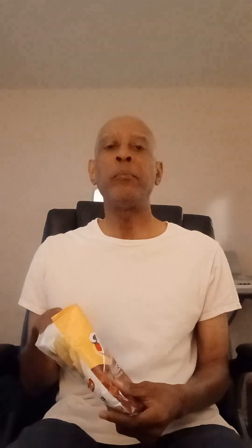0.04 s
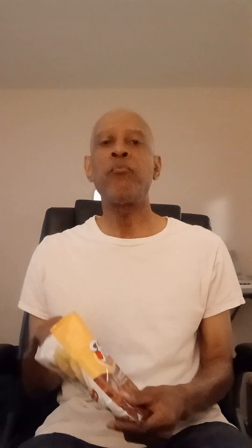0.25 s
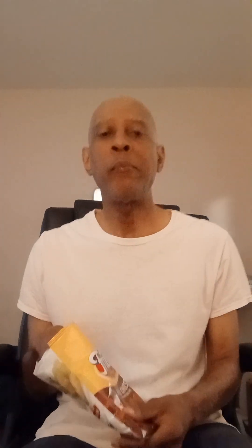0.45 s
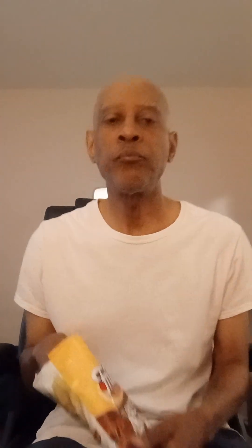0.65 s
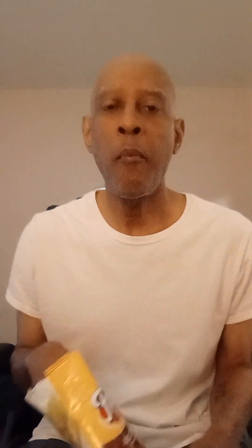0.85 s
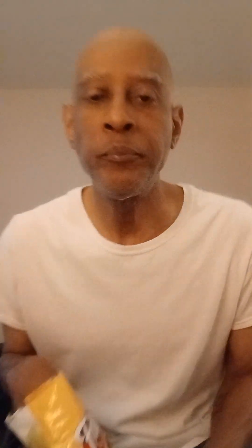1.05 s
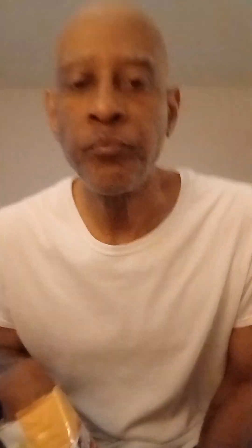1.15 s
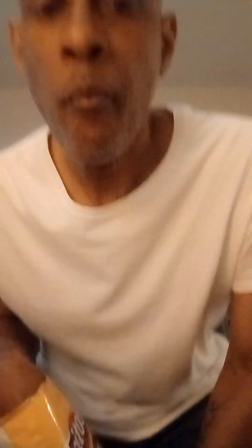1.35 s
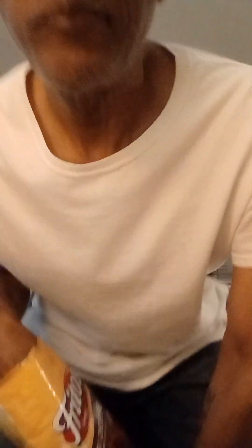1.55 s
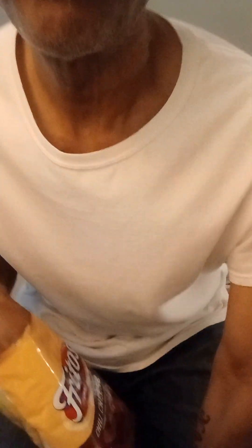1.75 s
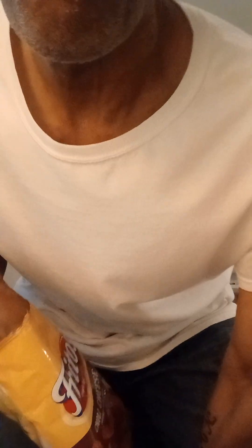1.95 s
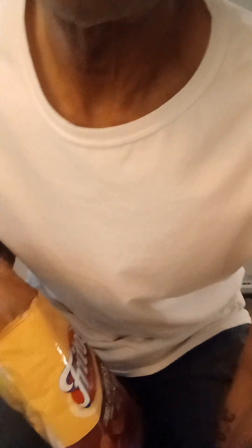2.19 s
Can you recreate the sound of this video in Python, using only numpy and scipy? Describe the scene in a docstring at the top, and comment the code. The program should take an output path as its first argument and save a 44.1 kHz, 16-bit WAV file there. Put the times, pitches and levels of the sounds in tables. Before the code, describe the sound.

A foil snack bag crackles at once, a crisp snap near 0.1 s, then lighter crinkles to 0.35 s and near quiet. Sharp clusters burst around 0.75-0.9 and 1.1-1.2 s. At about 1.3-1.4 s a chair and table thump low and dull. Strong snaps return at 1.6-1.8 s, then faint crinkle, soft cloth rustle and a slight bump at 1.9 s. Small room, close microphone, very faint hum.

```python
"""Still air and a hum lie under the whole scene; a small room answers the bag.
A foil snack bag is handled from the start: creases snap over, each a short crack of its own colour,
above a fine crinkle of ticks and hiss; more cracks cluster near 0.75 and 1.15 s.
About 1.3 s, as a man leans out of his chair, chair and table thump low: shaped noise and ringing modes.
Strong cracks return until 1.8 s, then only faint ones, with dull rustle and one last bump."""
import sys
import numpy as np
from scipy import signal
from scipy.fft import rfft, irfft, next_fast_len
from scipy.io import wavfile
from scipy.ndimage import map_coordinates

SR = 44100
rng = np.random.default_rng(int(sys.argv[2]) if len(sys.argv) > 2 else 0)


def gain_from_decibels(decibels):
    """Convert decibel values to linear amplitude factors."""
    exponent = np.asarray(decibels, float) / 20
    return 10 ** exponent


def unload_wav(signal):
    """Save mono or channel-first audio to the path in sys.argv[1] as 16-bit WAV at rate SR, clipped to [-1, 1]."""
    wavfile.write(
        sys.argv[1],
        SR,
        np.round(np.clip(np.atleast_2d(signal).T, -1, 1) * 32767).astype(np.int16),
    )


N = 98078  # samples


def unit(x):
    """Scales to rms 1."""
    return x / np.sqrt(np.mean(x ** 2) + 1e-20)


def along(points, hz):
    """Reads (Hz, value) points on a log frequency axis."""
    point_hz, value = np.transpose(points)
    return np.interp(np.log(hz + 1), np.log(point_hz + 1), value)


def curves(rows):
    """One value per sample for each column after the time."""
    time_s, *columns = np.transpose(rows)
    return [np.interp(np.arange(N) / SR, time_s, column) for column in columns]


def wobble(rate_hz):
    """A smooth random curve, rate_hz knots a second."""
    knots = rng.standard_normal(int(N * rate_hz / SR) + 4)
    return map_coordinates(knots, [np.arange(N) * rate_hz / SR])


def filtered(x, response):
    """x times a complex response of frequency."""
    size = next_fast_len(N + SR // 2)
    return irfft(rfft(x, size) * response(np.fft.rfftfreq(size, 1 / SR)), size)[..., :N]


def noise(spectrum, alike):
    """Stereo noise of rms 1; alike is the correlation of the sides."""
    a, b = filtered(rng.standard_normal((2, N)), lambda hz: gain_from_decibels(along(spectrum, hz)))
    turn = np.arccos(np.clip(alike, -1, 1)) / 2
    left = np.cos(turn) * a + np.sin(turn) * b
    right = np.cos(turn) * a - np.sin(turn) * b
    return unit(np.array([left, right]))


# still-air spectrum: freq_hz, relative_db
AIR_SPECTRUM = [(120, -49), (200, -21), (361, -12), (814, -58), (2510, -8), (10200, -17), (12500, -18),
                (15600, -6), (16500, -38)]
AIR_RMS_DB = -76.5
HUM_HZ, HUM_PEAK_DB = 123.8, -67.5


def floor():
    """Still room air as shaped noise, and a hum as a sine of wavering level."""
    hum_gain = gain_from_decibels(HUM_PEAK_DB + 0.92 * wobble(5.72))
    hum = hum_gain * np.sin(2 * np.pi * HUM_HZ * np.arange(N) / SR)
    return gain_from_decibels(AIR_RMS_DB) * noise(AIR_SPECTRUM, 0.057) + hum


# reverberation: freq_hz, t60_s
ROOM_DECAY = [(200, 0.24), (1500, 0.28), (5000, 0.31), (14000, 0.24)]
ROOM_DB, ROOM_GAP_S = -6, .003


def room(x):
    """Each frequency dies at its own speed; every 0.1 s stretch meets a new noise tail."""
    out, step = np.zeros((2, N + 2 * SR)), SR // 10
    for start in range(0, N, step):
        hz, t, z = signal.stft(rng.standard_normal((2, SR // 2)), SR, nperseg=256)
        decay = gain_from_decibels(-60 * t / along(ROOM_DECAY, hz)[:, None])
        tail = signal.istft(z * decay, SR, nperseg=256)[1]
        tail = tail / np.linalg.norm(tail[0])
        wet = signal.fftconvolve(x[:, start:start + step], tail, axes=1)
        out[:, start + round(ROOM_GAP_S * SR):][:, :wet.shape[1]] += wet
    return out[:, :N]


# chair rumble: time_s, deep_db, upper_bass_db
CHAIR_LEVELS = [(0.0, -70, -95), (0.2, -61.5, -73), (0.22, -46, -62), (0.3, -53.5, -73), (0.67, -68, -69.5),
                (0.72, -50.5, -63), (0.77, -64.5, -64), (1.03, -61.5, -71), (1.21, -86, -54.5),
                (1.3, -60, -54), (1.32, -42, -29.5), (1.34, -51, -26), (1.375, -28, -37), (1.415, -31, -41),
                (1.45, -58, -51.5), (1.67, -61, -61), (1.74, -51, -56.5), (1.87, -67, -66),
                (1.94, -64, -52.5), (1.98, -78, -66), (2.03, -57, -58), (2.13, -68, -67),
                (2.16, -69, -52.5), (2.22, -82, -65)]
# rumble spectra: freq_hz, relative_db
DEEP_SPECTRUM = [(18, -58), (30, 1), (54, -3.5), (86, -10), (100, -14), (130, -63), (220, -120)]
UPPER_SPECTRUM = [(47, 1), (80, 0), (130, 4.5), (237, 1), (280, -12), (360, -24), (620, -120)]
# rustle of clothes and upholstery: time_s, relative_db
CLOTH_LEVELS = [(0.0, -82), (0.04, -84), (0.07, -55.5), (0.18, -78.5), (0.22, -60.5), (0.44, -82.5),
                (0.61, -61), (0.695, -71.5), (0.72, -54.5), (0.83, -52), (0.98, -77.5), (0.99, -61.5),
                (1.1, -72.5), (1.12, -52), (1.29, -55), (1.32, -55), (1.38, -49.5), (1.48, -64), (1.5, -54),
                (1.56, -73), (1.58, -46.5), (1.8, -55), (1.85, -66.5), (1.95, -55), (1.98, -66),
                (2.02, -53.5), (2.1, -78.5), (2.17, -61.5), (2.22, -78)]
# rustle spectrum: freq_hz, relative_db
CLOTH_SPECTRUM = [(150, -43), (250, -1.5), (318, 1.5), (461, 5.5), (700, -6.5), (910, -30), (1540, -120)]
CLOTH_GAIN_DB = 0.5


def chair():
    """Shifting weight: two bands of lumpy low rumble and a dull rustle."""
    deep_db, upper_db = curves(CHAIR_LEVELS)
    cloth_db, = curves(CLOTH_LEVELS)
    deep = gain_from_decibels(deep_db + 0.55 * wobble(21.0)) * noise(DEEP_SPECTRUM, 0.93)
    upper = gain_from_decibels(upper_db + 0.45 * wobble(30.2)) * noise(UPPER_SPECTRUM, 0.69)
    cloth_gain = gain_from_decibels(cloth_db + CLOTH_GAIN_DB + 2.24 * wobble(49.72))
    return deep + upper + cloth_gain * noise(CLOTH_SPECTRUM, 0.77)


# soft blows: start_s, relative_db, hardness_db_per_octave (tilt about the third table mode)
BUMP_EVENTS = [(0.209, -41.5, -3), (0.711, -40.5, 9), (1.308, -34.5, 10), (1.321, -19.5, -7.5),
               (1.339, -20, -11.5), (1.369, -32.5, 4), (1.393, -40, 3), (1.408, -46, 4),
               (1.496, -40.5, 7.5), (1.915, -41.5, -11.5)]
# table modes: freq_hz, relative_db, t60_s
TABLE_MODES = [(43.5, -17, 0.2), (74, -11, 0.067), (132.2, 3.5, 0.099), (221.7, 2, 0.086),
               (313.4, -5.5, 0.069), (345.6, -9.5, 0.12)]
BUMP_GAIN_DB, BUMP_RISE_S = -4.5, 0.0076


def bumps():
    """Soft blows ring the table's low modes, harder ones brighter, each mode's level varying at random."""
    out, t = np.zeros(N + SR), np.arange(SR // 2) / SR
    pivot_hz = TABLE_MODES[2][0]
    for start_s, level_db, hard_db in BUMP_EVENTS:
        ring = 0
        for hz, mode_db, t60_s in TABLE_MODES:
            mode_db = mode_db + hard_db * np.log2(hz / pivot_hz) + rng.normal(0, 1)
            ring = ring + gain_from_decibels(mode_db - 60 * t / t60_s) * np.sin(2 * np.pi * hz * t)
        rise = 1 - np.exp(-t / BUMP_RISE_S)
        out[round(start_s * SR):][:len(t)] += gain_from_decibels(level_db + BUMP_GAIN_DB) * ring * rise
    return out[:N]


# small flat foil facets that pop: start_s, relative_db, pitch_hz
PING_EVENTS = [(0.283, -42, 3270), (0.982, -43, 2930), (1.164, -47, 2440), (1.306, -32.5, 730),
               (1.336, -40.5, 2690), (1.336, -42, 6980), (1.643, -31, 2940), (1.886, -49, 2130),
               (2.101, -58, 7300), (2.160, -46.5, 7140)]
PING_T60_S, PING_RISE_S = .02, 0.0013


def pings():
    """Each facet rings as a close pair of notes and dies fast."""
    out, t = np.zeros(N + SR), np.arange(4096) / SR
    for start_s, level_db, hz in PING_EVENTS:
        second_hz = hz * rng.normal(1, 0.01)
        pair = np.sin(2 * np.pi * hz * t) + .5 * np.sin(2 * np.pi * second_hz * t)
        envelope = gain_from_decibels(level_db - 60 * t / PING_T60_S) * (1 - np.exp(-t / PING_RISE_S))
        out[round(start_s * SR):][:len(t)] += envelope * pair
    return out[:N]


GRAINS, SPREAD_DB, LIFE_CYCLES = 5000, 4.5, 4


def ticks(lo_hz, hi_hz, spectrum):
    """Random tiny ticks, each a damped sine of a few cycles and uneven size; rms 1."""
    u, t = rng.random((GRAINS, 3)), np.arange(192) / SR
    hz = lo_hz * (hi_hz / lo_hz) ** u[:, 1:2]
    size_db = -SPREAD_DB * np.log(1.01 - u[:, 2:]) + along(spectrum, hz)
    wave = gain_from_decibels(size_db) * hz * np.sin(2 * np.pi * hz * t) * np.exp(-t * hz / LIFE_CYCLES)
    at = (u[:, :1] * N).astype(int) + np.arange(len(t))
    return unit(np.bincount(at.ravel(), wave.ravel(), N + len(t))[:N])


# squeezing hand: time_s, crinkle_db, body_db
CRINKLE_LEVELS = [(0, -36.5, -63), (.02, -54, -59.5), (.065, -55, -68), (.1, -48.5, -54.5), (.15, -68, -83),
                  (.22, -63, -60.5), (.3, -61, -70), (.36, -63, -77), (.45, -75, -80.5), (.6, -65, -65),
                  (.7, -68.5, -72), (.73, -61, -63), (.79, -43, -48), (.86, -63.5, -70), (.89, -49, -59),
                  (.95, -81, -83), (1.0, -59.5, -62.5), (1.1, -70, -83), (1.125, -39.5, -46),
                  (1.17, -47, -57.5), (1.23, -63, -58), (1.31, -53, -59.5), (1.42, -59, -70),
                  (1.56, -55, -62.5), (1.6, -46.5, -52), (1.7, -53.5, -57), (1.8, -58.5, -64),
                  (1.865, -66, -76), (1.9, -55, -64), (1.965, -59, -59.5), (2.05, -74.5, -89),
                  (2.13, -68.5, -76), (2.16, -59, -71.5), (2.22, -71, -80)]
# foil spectrum: freq_hz, relative_db
FOIL_SPECTRUM = [(880, -27), (1500, 1), (2110, -3), (2530, 6), (5470, 1.5), (9790, -5.5), (13500, 0),
                 (16000, -17), (16500, -45)]
# bag and chips spectrum: freq_hz, relative_db
BODY_SPECTRUM = [(350, -41), (600, -12), (818, -3), (989, -4), (2200, -2.5), (2860, -5), (4840, -120)]
TICK_DB, HISS_DB = -4, 0


def crinkle():
    """Fine ticks and the hiss of sliding foil follow the squeezing hand, in a high and a body band."""
    def texture(lo_hz, hi_hz, spectrum):
        return gain_from_decibels(TICK_DB) * ticks(lo_hz, hi_hz, spectrum) + gain_from_decibels(HISS_DB) * noise(spectrum, 0.33)

    foil_db, body_db = curves(CRINKLE_LEVELS)
    high = gain_from_decibels(foil_db + 1.18 * wobble(39.45)) * texture(2070, 13100, FOIL_SPECTRUM)
    low = gain_from_decibels(body_db + 2.62 * wobble(30.26)) * texture(610, 1678, BODY_SPECTRUM)
    return high + low


# creases: start_s, level_db, crease_hz, body_rel_db, crease_rel_db, treble_rel_db, drag_factor
# (drag_factor stretches rise and decay, before the extra drag of weak creases)
SNAP_EVENTS = [(0.075, -22.5, 3870, -23, -19, -13.5, 0.87), (0.083, -33, 5100, -37, -12, -5.5, 1.24),
               (0.1067, -35.5, 3400, -41, -11, -23, 1.3), (0.2343, -42.5, 3360, -16, -14, -14, 0.67),
               (0.2721, -32.5, 3740, -18.5, -18, -17, 1.33), (0.3172, -37.5, 3770, -10.5, -21, -37, 0.86),
               (0.3241, -29.5, 3460, -18, -11.5, -22.5, 0.86), (0.515, -51, 4170, -15, -8.5, -13, 1.2),
               (0.5917, -49, 2950, -11, -8, -33, 1.2), (0.6845, -45.5, 3300, -11, -12.5, -24, 0.86),
               (0.7088, -47, 2000, -4.5, -16, -35, 1.6), (0.7285, -39, 4840, -15, -8.5, -18, 1.1),
               (0.742, -49.5, 2350, -28, -2.5, 1, 0.48), (0.7587, -18.5, 4570, -21, -20, -12.5, 1.13),
               (0.767, -28.5, 5500, -13.5, -24, -18, 1.5), (0.7848, -29, 4830, -13, -24, -27, 1.12),
               (0.7962, -37.5, 3000, -3, -9.5, -29, 0.44), (0.8076, -22.5, 4700, -19, -25.5, -16.5, 1.2),
               (0.8788, -35, 4350, -9, -11, -10, 1.07), (1.018, -39.5, 5100, -19, -12, -34, 0.58),
               (1.1097, -42, 5200, -18, -13, -15, 0.87), (1.1209, -27.5, 4500, -14, -12.5, -23, 0.77),
               (1.1313, -35, 5020, -29, -28, -7.5, 1.05), (1.1492, -19, 3100, -15, -17, -10.5, 1.17),
               (1.1616, -27.5, 5660, -6.5, -15, -19, 1.53), (1.1645, -37.5, 2620, -33, -9, -3, 4.3),
               (1.2464, -44.5, 2500, -9, -9.5, -29, 0.77), (1.293, -35.5, 2110, -14.5, -11.5, -34, 0.58),
               (1.3085, -36, 2020, -17, -9, -14.5, 1.7), (1.3783, -26, 3370, -14.5, -14, -11.5, 1),
               (1.58, -28, 4830, -15, -13, -8.5, 1.4), (1.6439, -23.5, 3720, -27, -10.5, -16, 0.8),
               (1.6742, -16, 3750, -24, -17.5, -13.5, 1.23), (1.7237, -30.5, 5410, -17, -23, -13.5, 2),
               (1.7892, -33.5, 4800, -14.5, -14.5, -24, 0.66), (2.0033, -49.5, 3960, -7.5, -32, -39, 0.39),
               (2.1436, -51, 2550, -24, -11.5, -10, 2.7), ]
# body, crease, treble: t60_s at drag 1
SNAP_T60_S = [0.024, 0.02, 0.011]
# body, crease, treble: gain_db
SNAP_GAIN_DB = [2.5, 4, 2]
BODY_HZ, TREBLE_HZ = 1115, 10900
SNAP_OCTAVES = (0.56, 0.46, 1)  # band widths: body, crease, treble
RISE_S, CLICK = .001, 3.2  # at drag 1
SIDE_SHARE = 0.82  # rattle that differs left and right
LOUD_DB, DRAG_DB_PER_DB = -22.5, .2  # weaker creases drag longer


def snaps():
    """A crease loads up, then clicks over its rattle: in the bag's body, at its own pitch, in the treble."""
    out, t, lead = np.zeros((2, N + SR)), np.arange(4096) / SR, 256
    f = np.fft.rfftfreq(len(t), 1 / SR) + 1
    for start_s, level_db, crease_hz, *rel, drag in SNAP_EVENTS:
        drag = np.clip(drag * gain_from_decibels(DRAG_DB_PER_DB * (LOUD_DB - level_db)), .3, 6)
        late = t - lead / SR - RISE_S * drag
        peak = np.argmax(late >= 0)
        load = np.clip(1 + late / (RISE_S * drag), 0, 1) ** 2
        centres_hz = (BODY_HZ, crease_hz, TREBLE_HZ)
        crack = 0
        for hz, octaves, t60_s, gain_db, rel_db in zip(
                centres_hz, SNAP_OCTAVES, SNAP_T60_S, SNAP_GAIN_DB, rel):
            middle, side = rng.standard_normal((2, len(t)))
            decay = gain_from_decibels(-60 * np.abs(late) / (t60_s * drag))
            rattle = middle + SIDE_SHARE * np.outer([1, -1], side)
            burst = rattle * np.where(late < 0, load, decay)
            burst[:, peak] += CLICK / drag ** 2
            bell = np.exp(-.5 * (np.log2(f / hz) / octaves) ** 2)
            band = irfft(rfft(burst) * bell)
            band = band / band[:, peak:peak + 128].std()
            crack = crack + gain_from_decibels(level_db + rel_db + gain_db) * band
        start = round(start_s * SR)
        out[:, start:start + len(t)] += crack
    return out[:, lead:N + lead]


LEFT_LAG_S = .00015


def scene():
    """The bag is nearer the right port, so the left hears it later; facets reach both alike."""
    bag = snaps() + crinkle()
    half_lags = np.array([[1], [-1]]) * LEFT_LAG_S / 2
    direct = filtered(bag, lambda hz: np.exp(-2j * np.pi * hz * half_lags))
    facets = pings()
    wet = gain_from_decibels(ROOM_DB) * room(bag + facets)
    return direct + facets + wet + chair() + bumps() + floor()


def band_limit(x):
    """A steep low-pass at the top of the band."""
    return signal.sosfilt(signal.butter(12, 16810, fs=SR, output="sos"), x)


# port colour: freq_hz, left_minus_right_db
PORT_COLOUR = [(60, 4), (200, -2.5), (500, -1.5), (1200, -2), (2400, 2), (4400, -4.5), (8100, 0.5),
               (14000, 1.5)]
LOW_CUT_HZ, TOP_HZ = 43, 16000


def record(dry):
    """The two ports differ in colour; a steep low cut and a sharp band limit follow."""
    def response(hz):
        colour = gain_from_decibels(along(PORT_COLOUR, hz) * np.array([[.5], [-.5]]))
        low_cut = 1 / np.sqrt(1 + (LOW_CUT_HZ / (hz + 1)) ** 12)
        return colour * low_cut * (hz < TOP_HZ)

    return band_limit(filtered(dry, response))


dry = scene()
out = record(dry)
unload_wav(out)
```